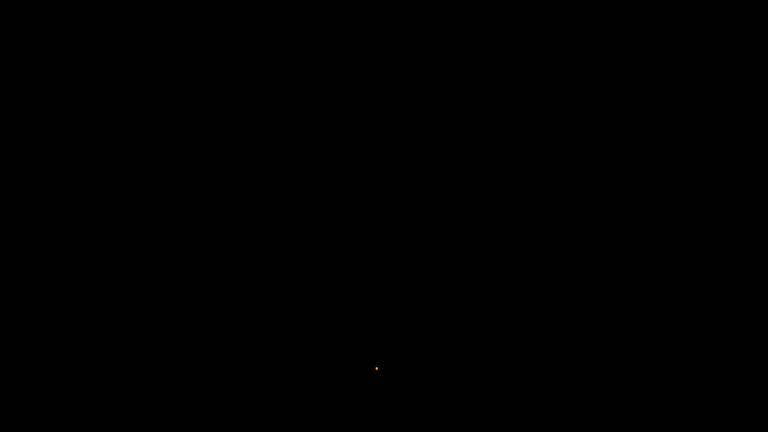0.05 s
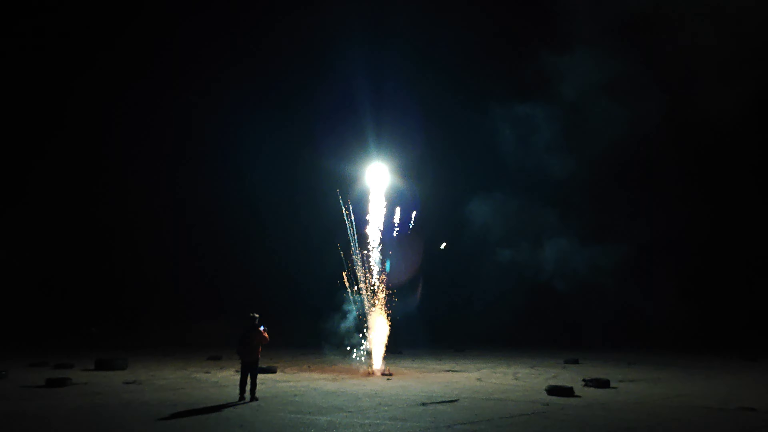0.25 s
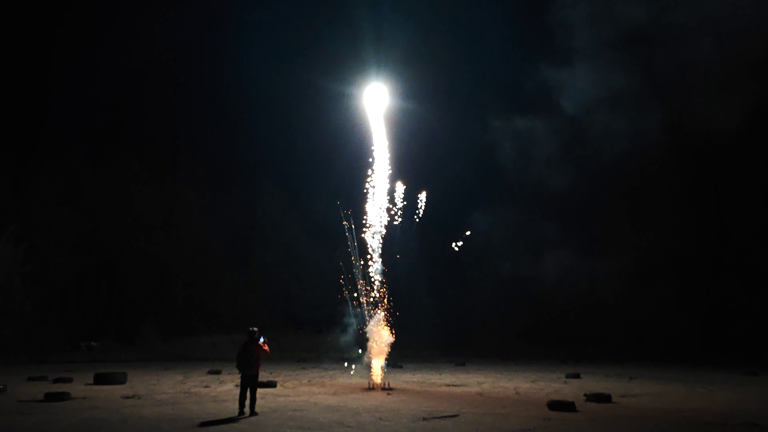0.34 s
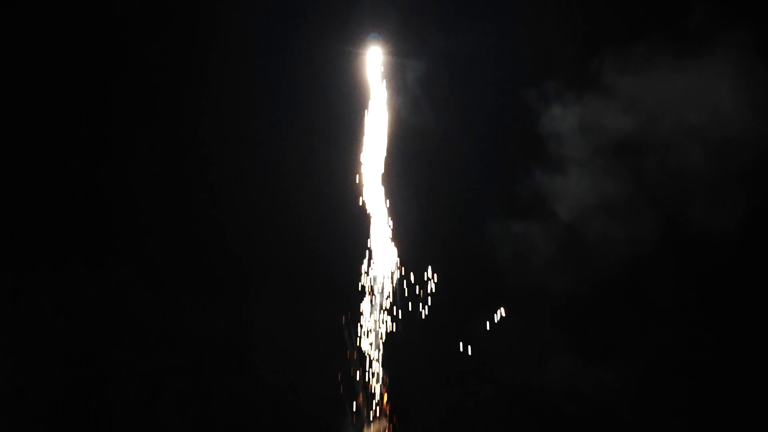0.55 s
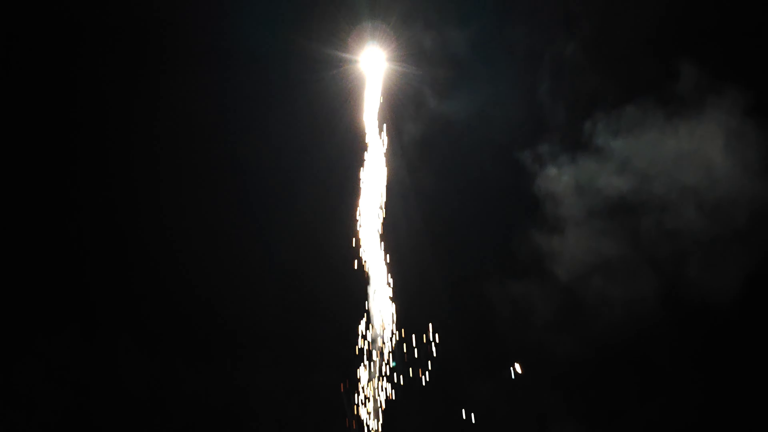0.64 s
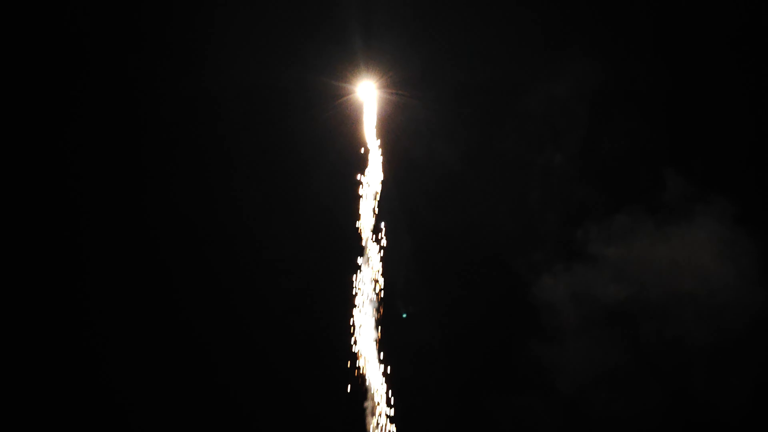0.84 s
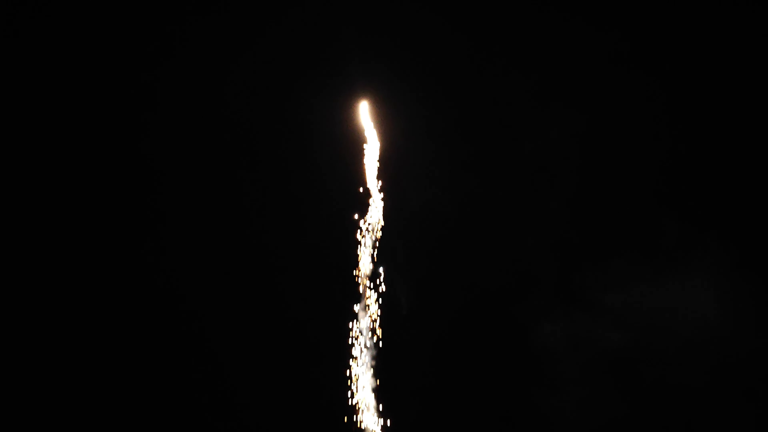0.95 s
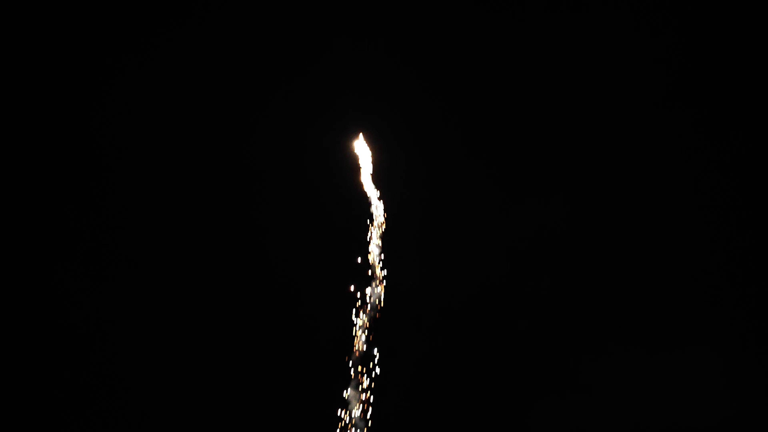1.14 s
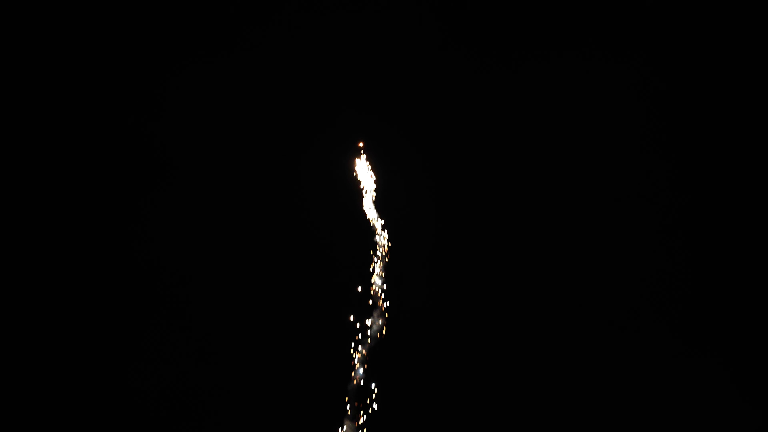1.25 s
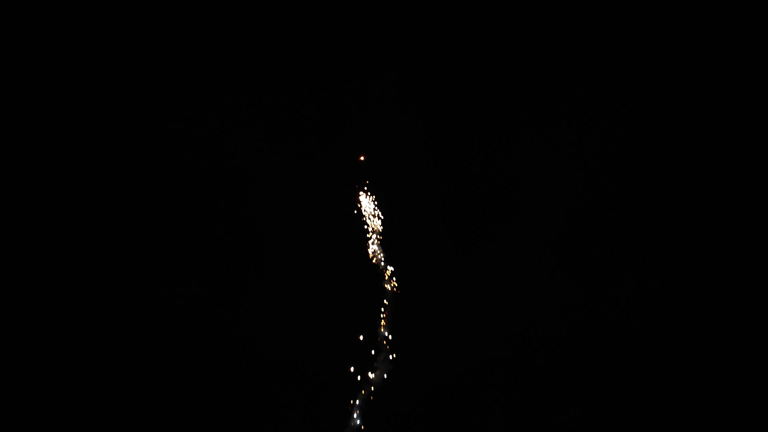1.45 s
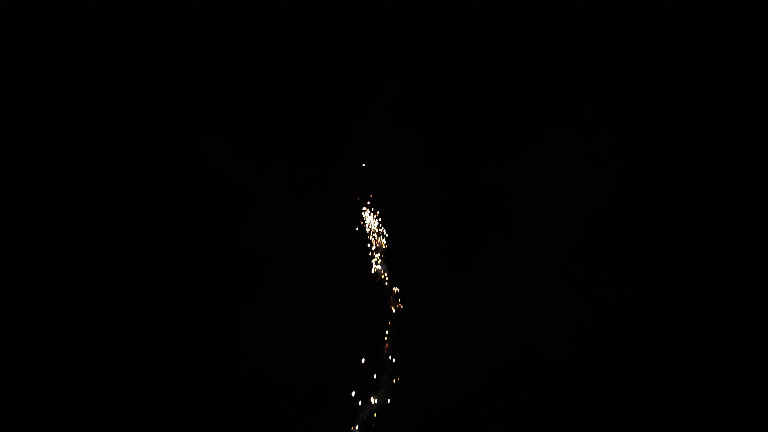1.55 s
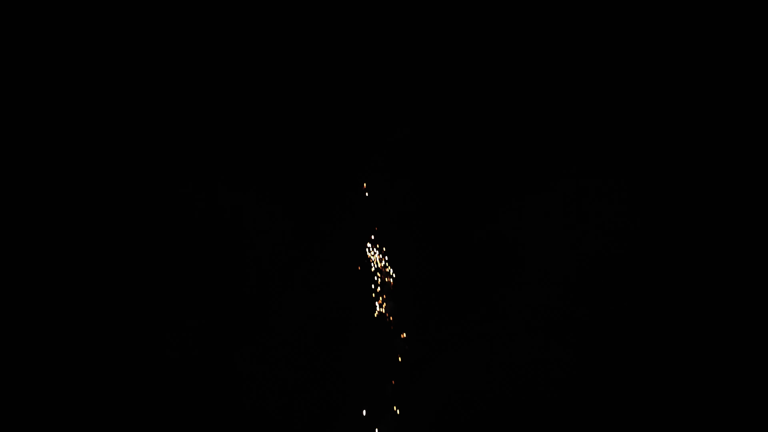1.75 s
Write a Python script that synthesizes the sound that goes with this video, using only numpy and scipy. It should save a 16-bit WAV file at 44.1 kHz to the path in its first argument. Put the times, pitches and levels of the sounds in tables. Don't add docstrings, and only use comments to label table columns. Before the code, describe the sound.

A firework launches from a tube close by: near silence with a faint fuse fizz, a sudden crackling bang that overloads the microphone, then dense echoes rolling over open ground, growing duller and fading.

```python
import sys
import numpy as np
from scipy import signal
from scipy.io import wavfile
from scipy.ndimage import uniform_filter1d

SR = 44100
rng = np.random.default_rng(int(sys.argv[2]) if len(sys.argv) > 2 else 0)


def voltage_ratio(decibels):
    exponent = np.asarray(decibels, float) / 20
    return 10 ** exponent


def generate_wav(signal):
    frames = np.transpose(np.atleast_2d(signal))
    scaled = np.clip(frames, -1, 1) * 32767
    pcm = np.round(scaled).astype(np.int16)
    wavfile.write(sys.argv[1], SR, pcm)


N = 79380
TIME = np.arange(N) / SR
BLAST_S = .2522
HALF_RING = 220

# frequency in Hz, likeness from -1 to 1.
INDEPENDENT = [(20, 0), (16000, 0)]


def evened(x):
    return x / np.sqrt(np.mean(x ** 2) + 1e-20)


def read(points, hz):
    f, value = np.transpose(points)
    return np.interp(np.log(hz + 1), np.log(f + 1), value)


def over_time(points, s):
    return np.interp(s, *np.transpose(points))


def add(mix, s, sound, pan_db=0):
    part = mix[:, round(s * SR):][:, :len(sound)]
    gain = voltage_ratio(np.minimum([[pan_db], [-pan_db]], 0))[:len(mix)]
    part += gain * sound[:part.shape[1]]


def shaped(pair, size, same, field_db, sideways=lambda hz, s: 0, left_db=lambda hz, s: 0):
    hz, s, z = signal.stft(pair, SR, nperseg=size, noverlap=size * 3 // 4)
    hz, s = hz[:, None], s[None]
    coherence = read(same, hz) - 1j * sideways(hz, s)
    coherence = coherence / np.maximum(abs(coherence), 1)
    independent = np.sqrt(abs(1 - abs(coherence) ** 2))
    tilt = voltage_ratio(left_db(hz, s) / 2)
    left = z[0] * tilt
    right = (coherence * z[0] + independent * z[1]) / tilt
    z = np.array([left, right]) * voltage_ratio(field_db(hz, s))
    return signal.istft(z, SR, nperseg=size, noverlap=size * 3 // 4)[1][:, :N]


def wavelet(hz, cycles, glide=0):
    turns = hz * np.arange(-HALF_RING, HALF_RING + 1) / SR
    bell = np.exp(-(2 * turns / cycles) ** 2)
    return np.cos(2 * np.pi * turns * (1 + glide * turns / 2)) * bell


def gate_db(s):
    return -7 * np.clip((s - 1.63) / .03, 0, 1)


def night():
    # frequency in Hz, density in dB per Hz.
    hum = [(20, 0.5), (74, -3.5), (120, -12.5), (300, -8), (750, -13.5), (1200, -27.5), (1900, -43),
           (5000, -46.5)]
    # frequency in Hz, left-right likeness.
    same = [(60, 0.94), (130, .95), (290, 0.56), (640, 0.03), (1410, -.2), (3100, .3), (6820, .3),
            (15000, 0)]
    # time in seconds, level in dB.
    wind = [
        (0, 1.5),
        (.55, 1),
        (.66, 9.5),
        (.85, 3),
        (1.1, -2),
        (1.3, 1),
        (1.8, 1),
    ]

    def colour(hz, s):
        return read(hum, hz) + over_time(wind, s) * (hz < 90) + gate_db(s) * (hz > 1710)

    return voltage_ratio(-52.5) * evened(shaped(rng.standard_normal((2, N)), 2048, same, colour))


def fuse():
    # frequency in Hz, density in dB per Hz.
    spectrum = [(1200, -20.5), (1800, -2.5), (3300, -1), (3800, -1.5), (6500, -6), (16000, -20.5)]
    fizz = shaped(rng.standard_normal((2, N)), 256, INDEPENDENT, lambda hz, s: read(spectrum, hz))
    return voltage_ratio(-79.5) * evened(fizz) * (TIME < BLAST_S)


def muzzle():
    # centre in seconds, peak in dB, ring in Hz, length in cycles, upward glide per cycle.
    cracks = [(.2385, -30, 2000, 2.5, 0), (.2415, -19, 2600, 1.5, 0), (.2425, -9, 2900, 2.4, 0),
              (.2431, -13, 3100, 1.5, 0), (.2436, -11, 4700, 2.5, .05), (.2443, -10, 4900, 3, 0),
              (.2441, -24, 15000, 12, 0), (.2447, -12, 2600, 1.8, -.05), (.2452, -15, 3600, 2, 0),
              (.2468, -13, 2500, .6, 0), (.2476, -2.5, 1650, 2.0, .2), (.2481, -19, 3600, 1.5, 0),
              (.2492, -17, 2000, 1.5, 0), (.2520, -3.5, 2900, .6, 0)]
    # frequency in Hz, density in dB per Hz.
    jet = [(180, -47.5), (300, -1), (1400, -6), (2600, -12.5), (4750, -21.5), (7000, -12), (10000, -15.5),
           (16000, -14)]
    # frequency in Hz, left-right likeness.
    same = [(60, 0.85), (130, 0.93), (290, 0.45), (640, 0.97), (1410, 0.75), (3100, 1), (6820, 0.72),
            (15000, 0.16)]
    jet_s, rise_s, stop_s = 0.2445, 0.0028, .2524
    gas = evened(shaped(rng.standard_normal((2, N)), 228, same, lambda hz, s: read(jet, hz)))
    rise = np.exp(np.minimum(TIME - jet_s, 0) / rise_s)
    cutoff = np.where(TIME < stop_s, 1, voltage_ratio(-40 - 340 * (TIME - stop_s)))
    level_db = -17 - 395.5 * np.maximum(TIME - jet_s, 0)
    out = voltage_ratio(level_db) * gas * rise * cutoff
    for s, db, hz, cycles, glide in cracks:
        add(out, s - HALF_RING / SR, voltage_ratio(db) * wavelet(hz, cycles, glide))
    return out


def blast():
    # centre in seconds, level in dB, sign, channel (0 left, 1 right).
    thumps = [
        (.400, -18, 1, 0),
        (.410, -21, 1, 1),
        (.508, -27, -1, 0),
        (.515, -28, 1, 1),
    ]
    push, length_s, capsule_limit, preamp_limit = 11.2, .026, 2.41, .78
    low_cut_hz, low_cut_q, front_s = 19.5, .52, .00012
    thump_hz, thump_cycles = 17, 1.0
    t = np.arange(SR // 4) / SR
    u = t / length_s
    pressure = -push * (1 - u) * np.exp(-u)
    wave = capsule_limit * np.tanh(pressure / capsule_limit)
    w = 2 * np.pi * low_cut_hz
    low_cut = signal.bilinear([1, 0, 0], [1, w / low_cut_q, w * w], SR)
    cut = signal.lfilter(*low_cut, wave)
    swing = preamp_limit * np.tanh(cut / preamp_limit) * (1 - np.exp(-t / front_s))
    turns = thump_hz * (t - t[-1] / 2)
    dull = np.sin(2 * np.pi * turns) * np.exp(-(2 * turns / thump_cycles) ** 2)
    out = np.zeros((2, N))
    add(out, BLAST_S, swing)
    for s, db, sign, side in thumps:
        add(out, s - t[-1] / 2, np.sign(sign) * voltage_ratio(db) * dull, 40 - 80 * round(side))
    return out


def hiss():
    # frequency in Hz, density in dB per Hz.
    spectrum = [(2000, -13), (3600, -10.5), (5300, -9.5), (6500, -1.5), (7600, -14), (11000, -2),
                (15000, -1.5)]
    # frequency in Hz, surplus on the left in dB.
    left = [(6000, 0), (7500, 3), (10000, 1.5), (13000, 0)]
    level_db = -60 - 6.5 * (TIME - BLAST_S) + gate_db(TIME)
    thin = shaped(rng.standard_normal((2, N)), 256, INDEPENDENT,
                  lambda hz, s: read(spectrum, hz), left_db=lambda hz, s: read(left, hz))
    return thin * voltage_ratio(level_db) * (TIME > BLAST_S)


def echoes():
    # time in seconds, level in dB.
    scenery = [(.256, -26), (.262, 2), (.277, -7.5), (.305, -1.5), (.34, 2.5), (.45, 1), (.52, 0),
               (.63, 1.5), (.7, 1.5), (.78, 1.5), (.87, 2), (.95, -1.5), (1.03, 1.5), (1.17, 0), (1.26, -1),
               (1.45, -2.5), (1.65, -1), (1.8, -2)]
    # frequency in Hz, extra share.
    treble_swing = [(120, -0.42), (280, -1.7), (700, -0.2), (2500, 0.39), (9000, 0.5)]
    # frequency in Hz, density in dB per Hz.
    spectrum = [(35, -29), (60, -13.5), (170, -2), (550, -3.5), (850, -6.5), (1150, -9.5), (5700, -17),
                (16000, -22)]
    # frequency in Hz, time to fall 60 dB in seconds.
    air = [(60, 0.35), (120, 1.1), (350, 2.235), (650, 3.75), (1500, 2.51), (3000, 1.574), (6300, 0.98),
           (8000, 0.61), (13000, 0.45)]
    # frequency in Hz, left-right likeness.
    same = [(160, .95), (450, .5), (950, -.5), (1400, -.15), (1900, .3), (2700, 0), (3800, -.2), (6000, 0)]
    # time in seconds, lean (positive left, negative right).
    bearing = [(.35, .75), (.9, .25), (1.15, -.3), (1.8, -.2)]
    # frequency in Hz, surplus on the left in dB.
    left_shine = [(6000, 0), (7200, 7), (11000, 6), (16000, 4)]
    peak_s, taps_per_s = 0.35, 16000

    def delay(s):
        return np.maximum(s - peak_s, 0)

    taps = rng.choice([-1., 1.], (2, N)) * (rng.random((2, N)) < taps_per_s / SR)
    clumps = evened(uniform_filter1d(uniform_filter1d(rng.standard_normal(N), 300), 300))
    spread_db = 3 * np.exp(-delay(TIME) / 0.11)
    sizes = np.minimum(rng.exponential(1, (2, N)), 5) - 0.88
    taps = evened(taps * voltage_ratio(spread_db * sizes + .7 * clumps))
    draw = rng.standard_normal((N // 128 + 8, 257)).T
    patches = evened(uniform_filter1d(uniform_filter1d(draw, size=3, axis=0), size=14, axis=1))

    def colour(hz, s):
        loss_db = 60 * delay(s) / read(air, hz)
        swing_db = read(treble_swing, hz) * over_time(scenery, s)
        bass_wait_db = -14 * np.clip((.31 - s) / 0.044, 0, 1) / (1 + (hz / 350) ** 4)
        return read(spectrum, hz) - loss_db + 1.3 * patches[:, :s.shape[1]] + swing_db + bass_wait_db

    def lean(hz, s):
        port_delay_s = .00045
        return over_time(bearing, s) * np.sin(2 * np.pi * hz * port_delay_s) * np.exp(-hz / 2000)

    def shine(hz, s):
        return read(left_shine, hz) * np.exp(-(delay(s) / .2) ** 2)

    out = shaped(taps, 512, same, colour, lean, shine)
    near_peak = (TIME > peak_s - .03) & (TIME < peak_s + .03)
    out = out / np.sqrt(np.mean(out[:, near_peak] ** 2))
    return out * voltage_ratio(-20.5 + over_time(scenery, TIME)) * (TIME > BLAST_S)


def slaps():
    # time in seconds, level in dB, length in seconds with sign, left minus right in dB,
    # share of sharp front.
    steps = [(.2524, -15, -.006, 0, 0), (.2554, -13, -.003, -20, .1), (.2614, -10, .0003, -9, 1),
             (.2621, -13, .0004, -14, 1), (.2676, -16, -.002, 3, 0), (.2843, -11, .002, -2, 0),
             (.2860, -14, -.0008, 0, 0), (.2872, -8, .002, 1, .75), (.2902, -14, .001, -4, .5),
             (.2922, -10, -.0016, -6, 0), (.2964, -12, -.0012, -8, 0), (.3120, -9, -.0008, -8, 0),
             (.3140, -13, .0008, 0, .7), (.3162, -10, .0015, 8, .6), (.3590, -5, .0006, 1, .1),
             (.3845, -11, .001, -8, .4), (.549, -19, .002, 0, .6), (.5825, -22, .0008, 0, .9),
             (.6225, -17, .0008, 0, .8)]
    out = np.zeros((2, N))
    t = np.arange(SR // 25) / SR
    for s, db, length, pan_db, front in steps:
        rise = .00006 + .0006 * np.sqrt(s - BLAST_S)
        after = np.maximum(t - 2 * rise, 0)
        u = after / abs(length)
        sharp = front * np.exp(-(t / rise - 2) ** 2)
        drop = (1 - np.exp(-(after / rise) ** 2)) * (1 - .5 * u) * np.exp(-u)
        add(out, s - 2 * rise, np.sign(length) * voltage_ratio(db) * (sharp - drop), pan_db)
    return out


def returns():
    # centre in seconds, peak in dB, ring in Hz, left minus right in dB,
    # left lead in ms. First the distinct dull returns from far walls.
    far = [(0.3388, -16.5, 640.0, -6, 0.8), (0.4227, -13, 653, 6, 0.4), (0.4377, -21.5, 640, -9, 0.3),
           (0.4644, -23, 870, 7, 0.5), (0.5104, -22, 669, -5, 0.25), (0.5983, -28, 670, -15, 0.11),
           (0.6463, -23.0, 650, 0, 0.1), (0.6989, -20.5, 604, 2, 0.1), (0.7445, -30, 655, 2.0, 0.077),
           (0.8304, -24, 570, -5, 0.042), (0.8671, -28.5, 656, -4.0, -0.1),
           (0.8875, -28.0, 930, -3.0, 0.027), (0.9102, -33, 645, -2, -0.078), (1.0559, -30, 595, 4, -0.2),
           (1.1271, -39, 650.0, -4, -0.44), (1.2973, -43, 810, -3, -0.5), (1.3064, -50, 770, -5, -0.55),
           (1.3606, -52, 627, 1.0, -0.4), (1.4334, -39, 783, -4, -0.44), (1.5077, -40.5, 536, 1, 0.0),
           (1.5656, -41, 600.0, -8.0, 0.44), (1.6175, -45, 670, 0, -0.45), (1.6545, -43, 650, -12, -0.43)]
    hard = [
        (0.564, -24, 1230, -7, .1),
        (.612, -23.5, 1290, -7, 0),
        (.645, -25.5, 1200, 5, .1),
        (.668, -23.5, 1220, 0, 0),
        (.700, -23.5, 1240, 1, 0),
        (1.018, -31, 2200, -2, 0),
    ]
    broad = [
        (.290, -17.5, 372, -3, 0),
        (0.389, -18, 426, 4, .2),
        (.472, -22.5, 335, 0, .1),
        (.549, -24.5, 280, -3.5, 0),
    ]
    out = np.zeros((2, N))
    for s, db, hz, pan_db, lead_ms in [*far, *hard, *broad]:
        knock = wavelet(hz * .88, 2.4)
        for side, sign in enumerate((1, -1)):
            start = s - HALF_RING / SR - sign * lead_ms / 2000
            add(out[side:side + 1], start, voltage_ratio(db - 2 + sign * pan_db / 2) * knock)
    return out


def sparks():
    # centre in seconds, peak in dB, ring in Hz, left minus right in dB, length in cycles.
    ticks = [
        (1.0656, -40, 5800, 2, 1.4),
        (1.0656, -40, 9000, 2, .25),
        (1.0718, -43, 6300, 2, 1.6),
        (1.0719, -50, 9500, 2, 1),
        (1.4115, -40, 2700, -1, 2),
        (1.4117, -39, 4200, -1, 2.2),
        (1.4128, -52, 5000, -1, 2.5),
        (1.4116, -49, 11000, -1, .5),
        (1.446, -64, 4200, 0, 2.5),
    ]
    out = np.zeros((2, N))
    for s, db, hz, pan_db, cycles in ticks:
        add(out, s - HALF_RING / SR, voltage_ratio(db) * wavelet(hz, cycles), pan_db)
    return out


def scene():
    return muzzle() + blast() + slaps() + echoes() + returns() + sparks() + night() + fuse()


def top_cut(x):
    return signal.sosfilt(signal.butter(12, 16790, fs=SR, output="sos"), x)


def record(dry):
    # frequency in Hz, gain in dB.
    mic = [(6750, 0.5), (7100, -8.5), (7600, -6.5), (10400, -5.5), (12600, -11), (15400, -5)]
    # frequency in Hz, gain in dB.
    housing = [(700, 0), (870, -1), (1150, 2), (1600, -1.5), (2300, 1), (3200, 1), (3700, -.5), (4700, 1),
               (6200, 0)]
    hz = np.linspace(0, SR / 2, 513)
    response = voltage_ratio(read(mic, hz) + read(housing, hz)) * (hz < SR / 2)
    colour = signal.firwin2(511, hz, response, fs=SR)
    edge = signal.firwin(1023, 15760, window=("kaiser", 8), fs=SR)
    mix = signal.oaconvolve(dry + hiss(), np.convolve(colour, edge)[None], "same")
    return top_cut(mix)


dry = scene()
out = record(dry)
generate_wav(out)
```